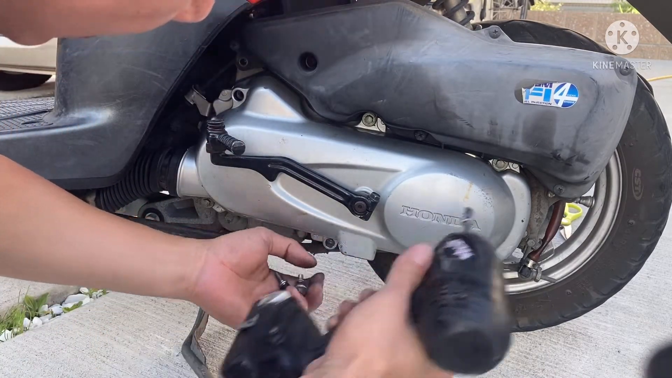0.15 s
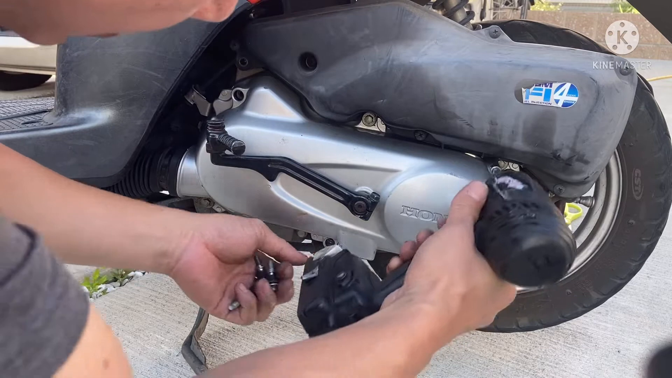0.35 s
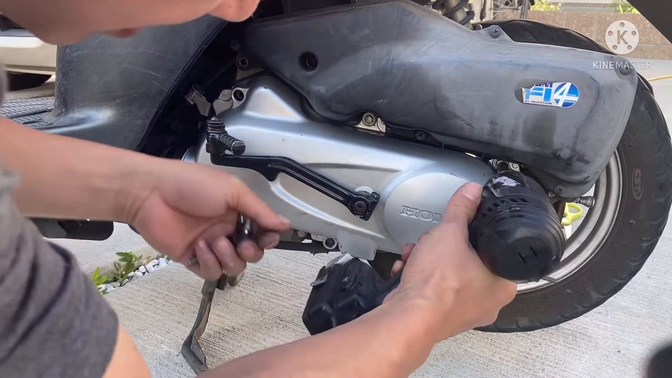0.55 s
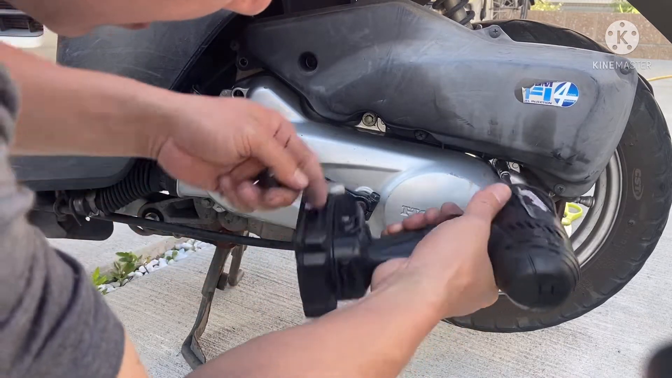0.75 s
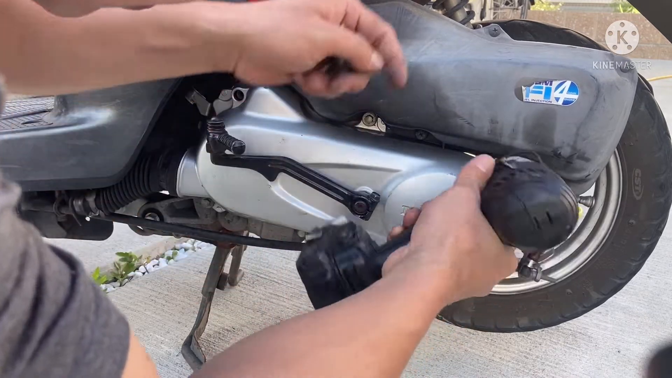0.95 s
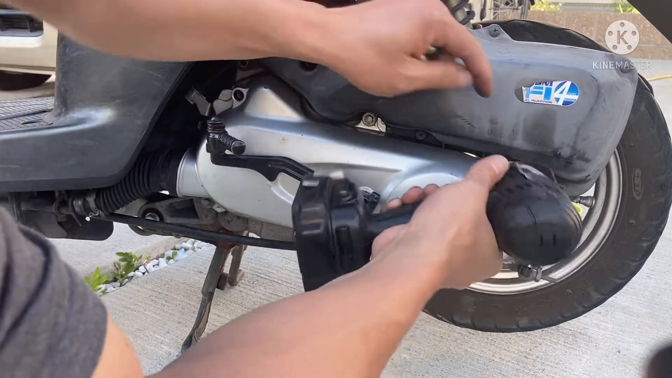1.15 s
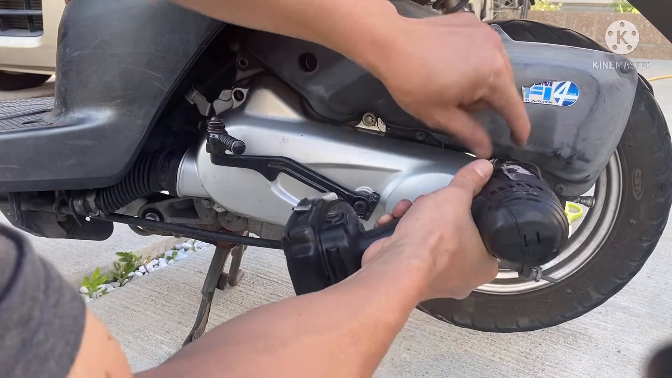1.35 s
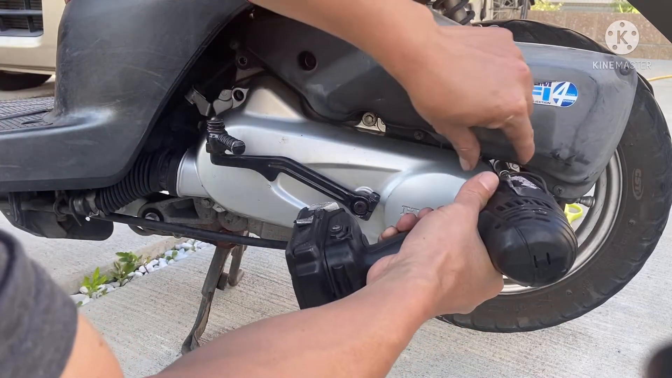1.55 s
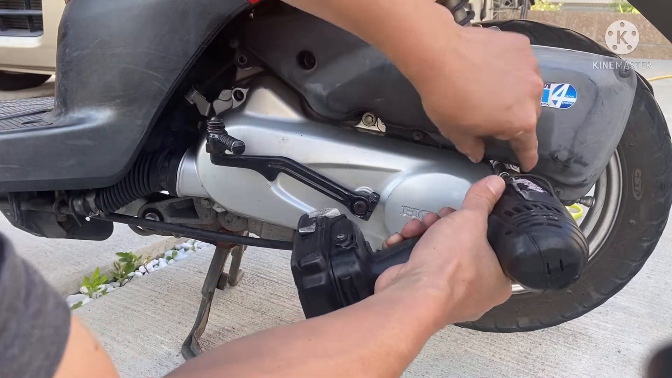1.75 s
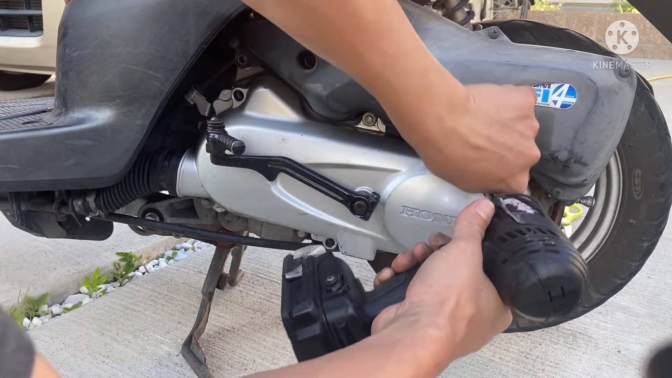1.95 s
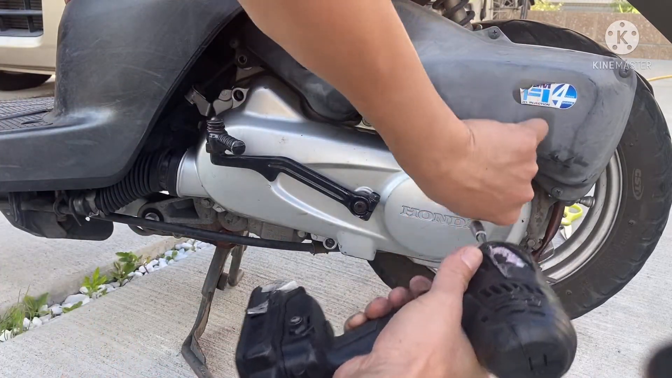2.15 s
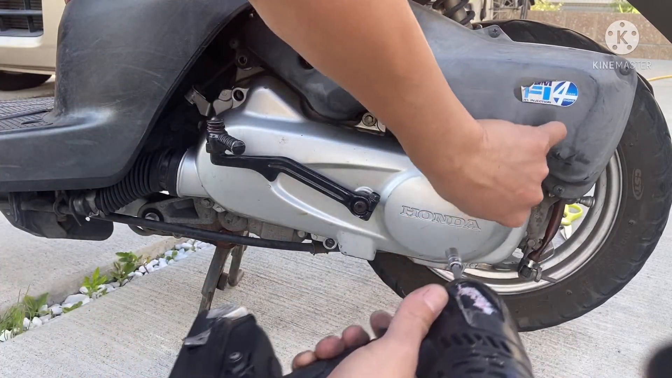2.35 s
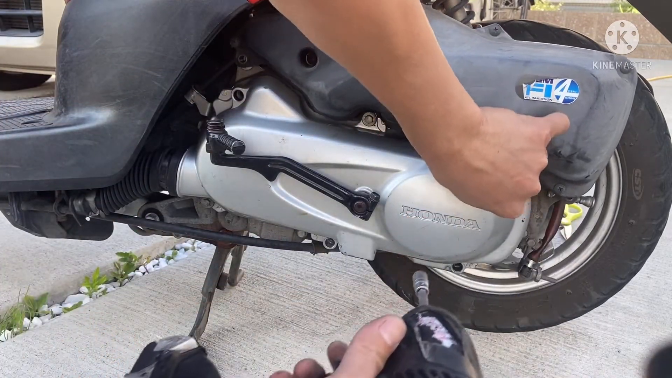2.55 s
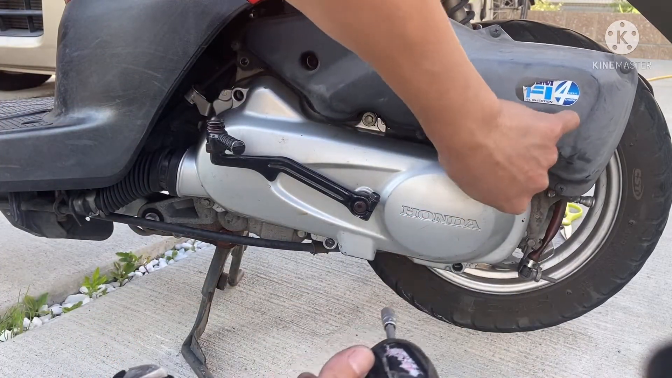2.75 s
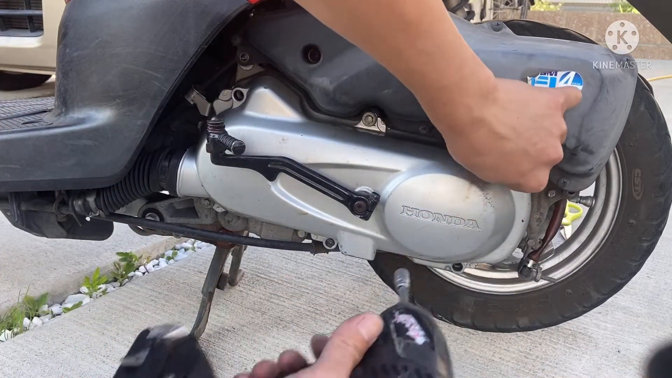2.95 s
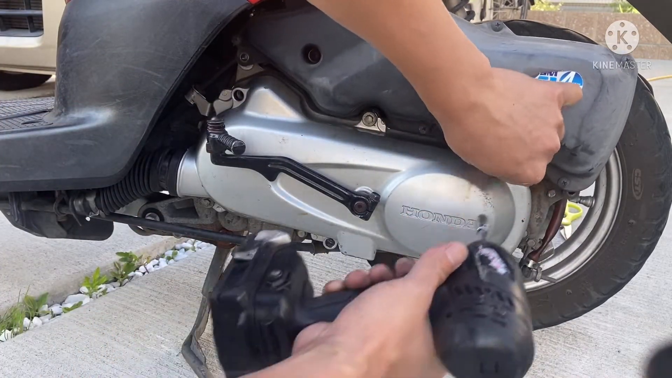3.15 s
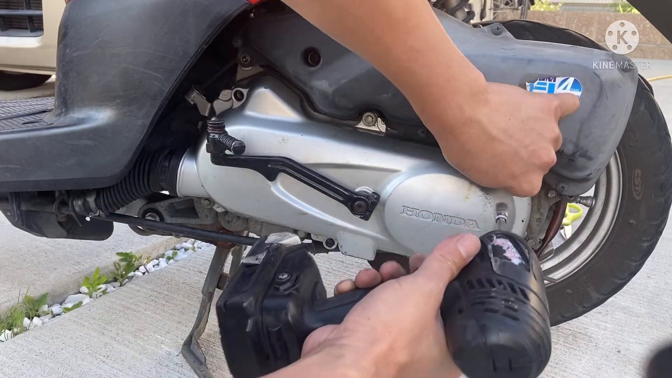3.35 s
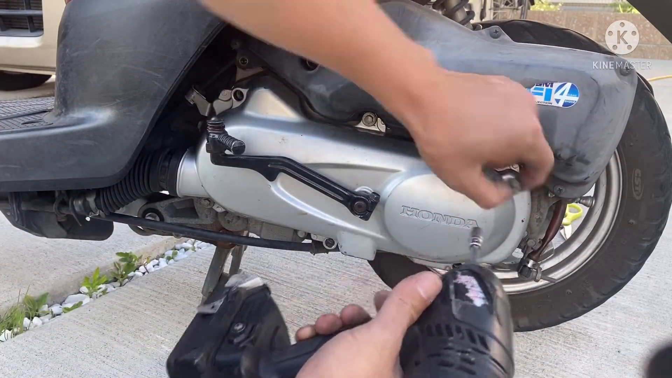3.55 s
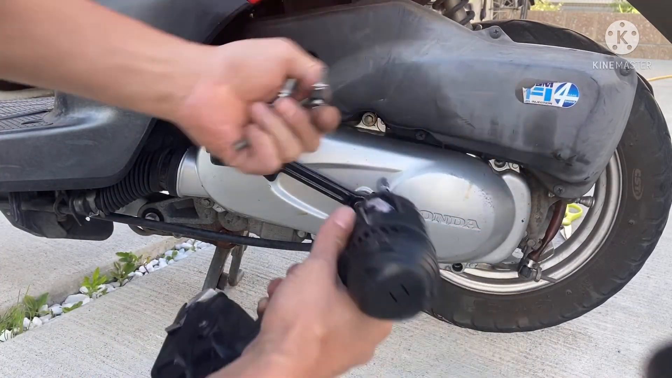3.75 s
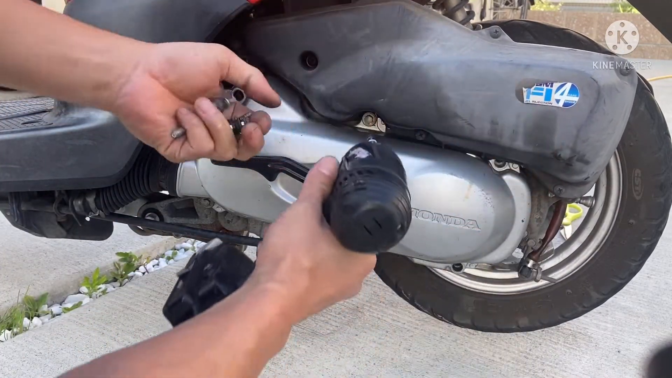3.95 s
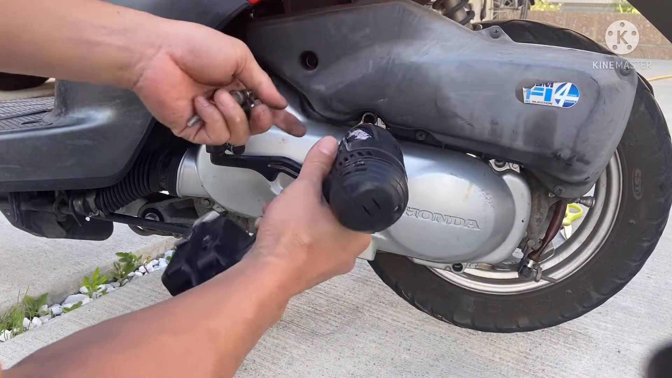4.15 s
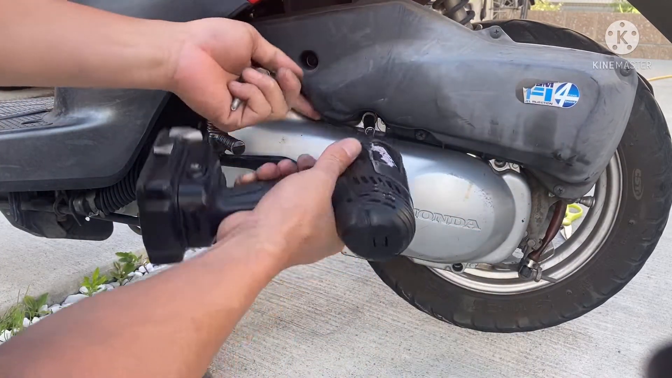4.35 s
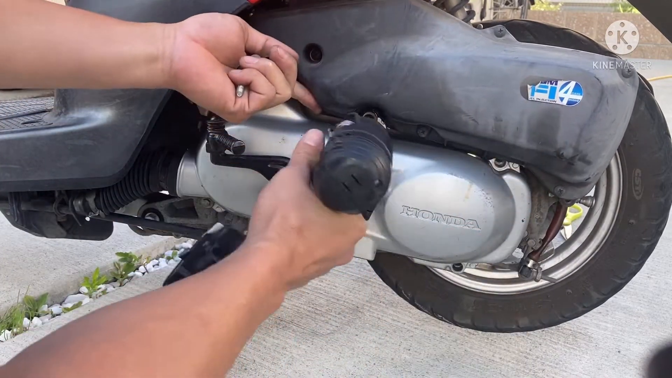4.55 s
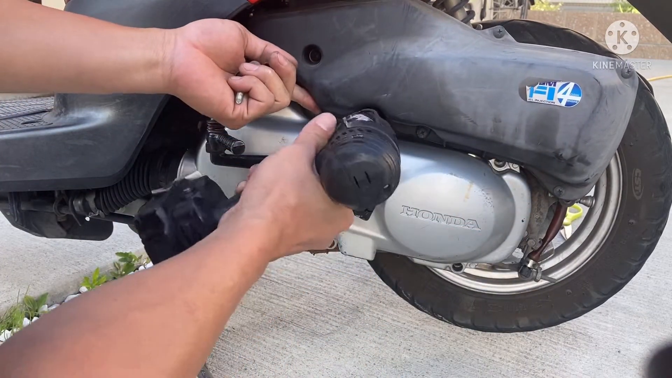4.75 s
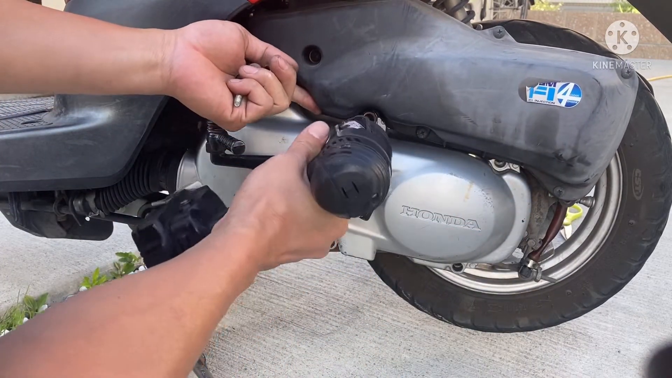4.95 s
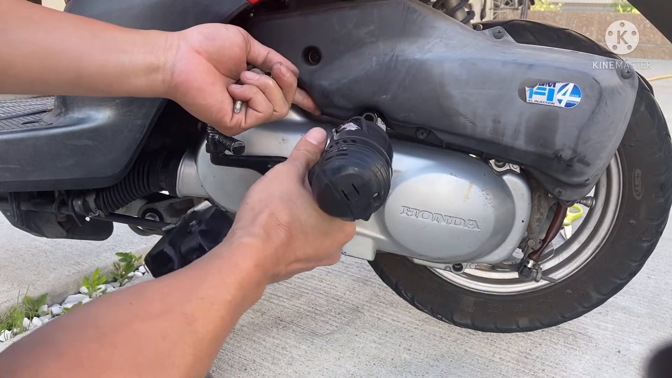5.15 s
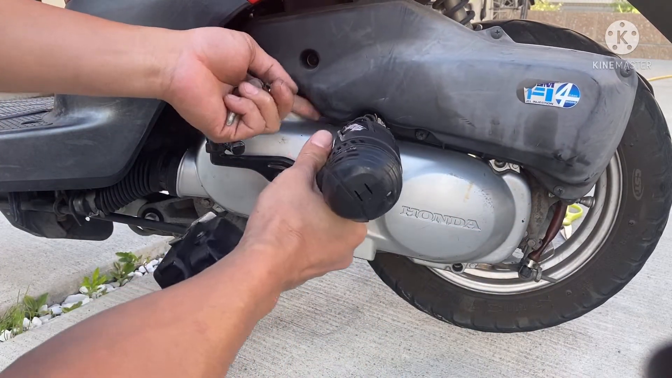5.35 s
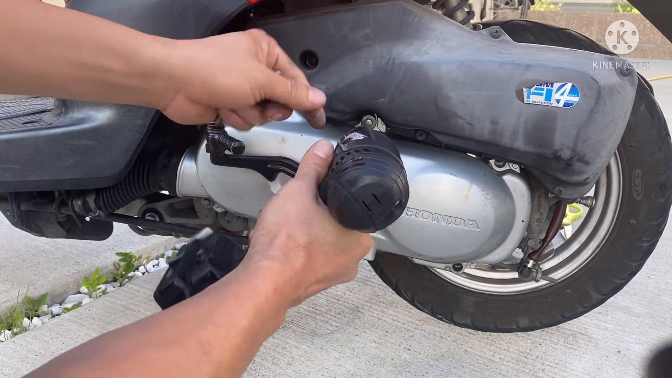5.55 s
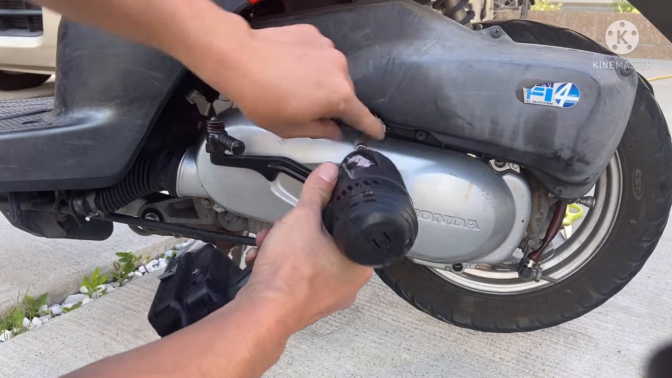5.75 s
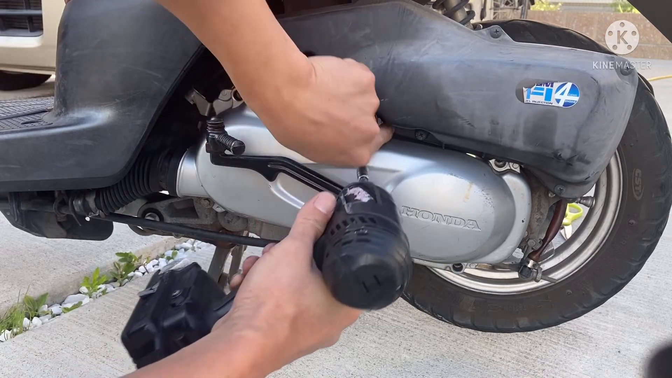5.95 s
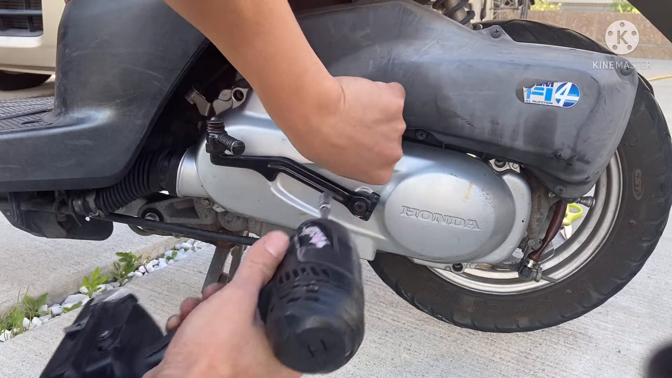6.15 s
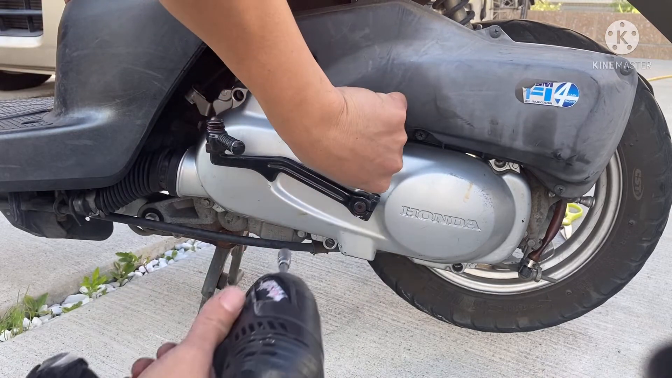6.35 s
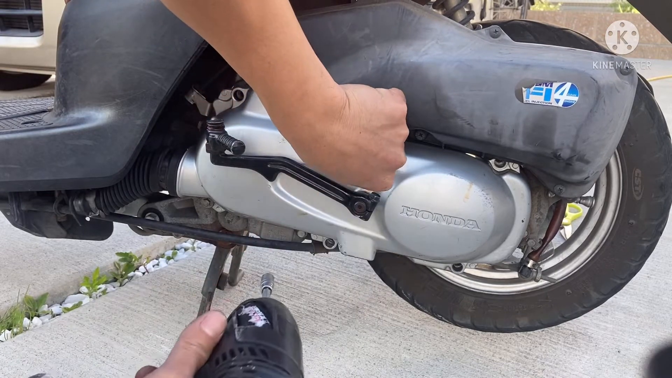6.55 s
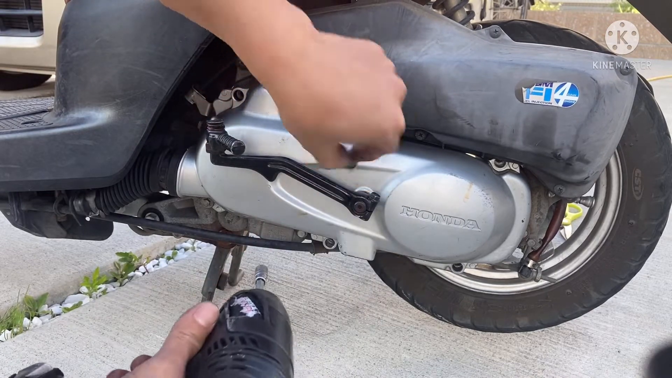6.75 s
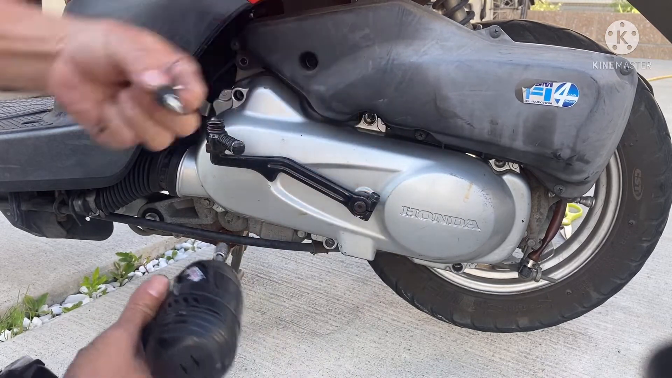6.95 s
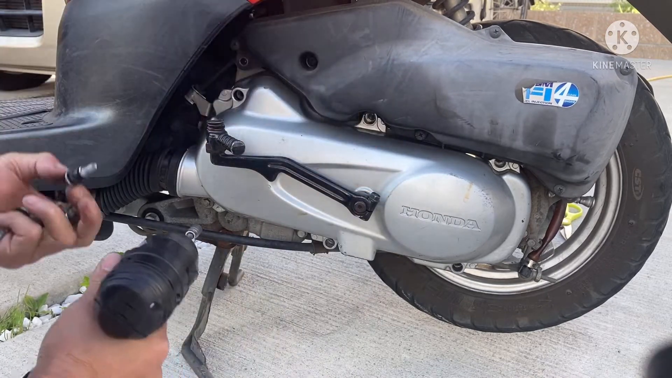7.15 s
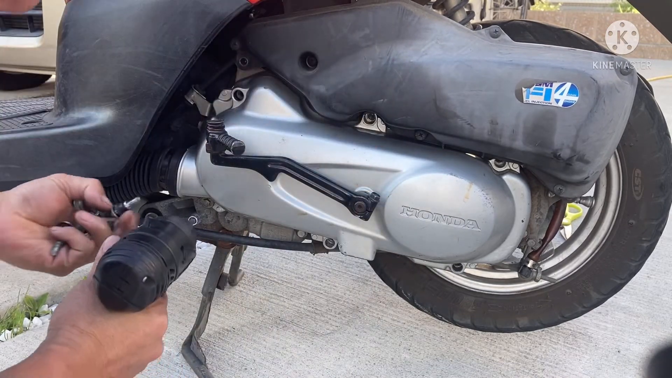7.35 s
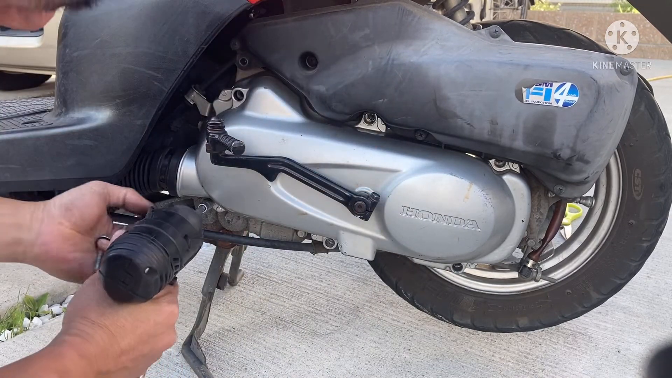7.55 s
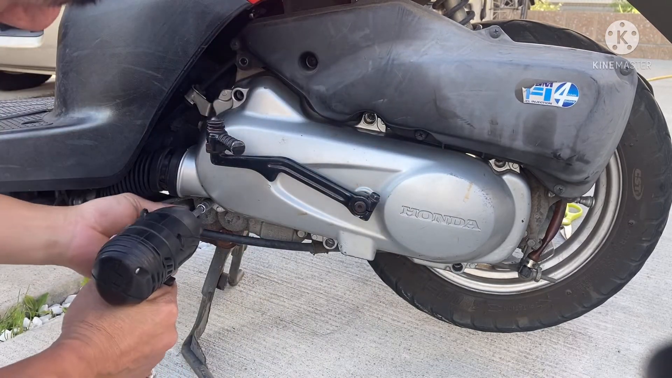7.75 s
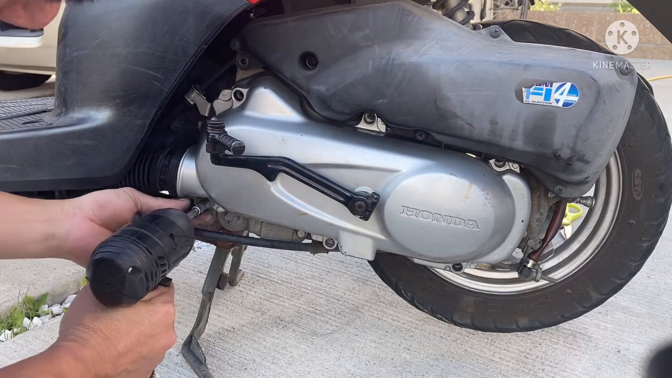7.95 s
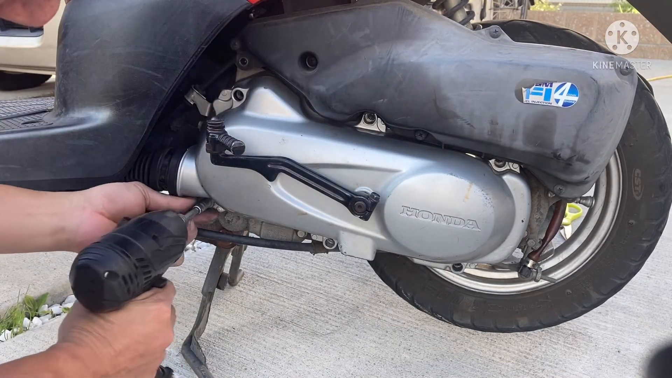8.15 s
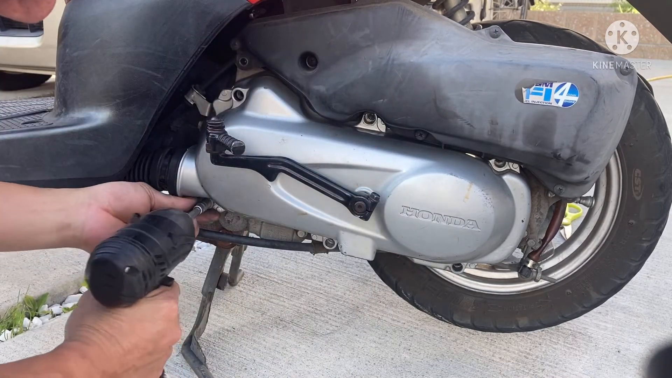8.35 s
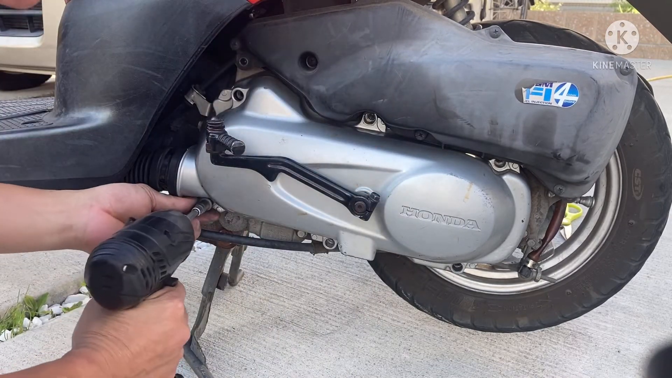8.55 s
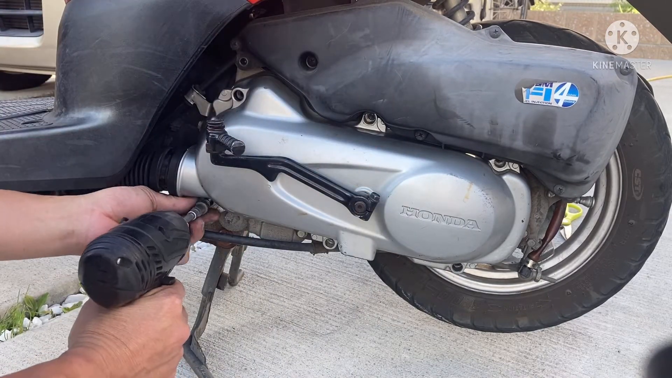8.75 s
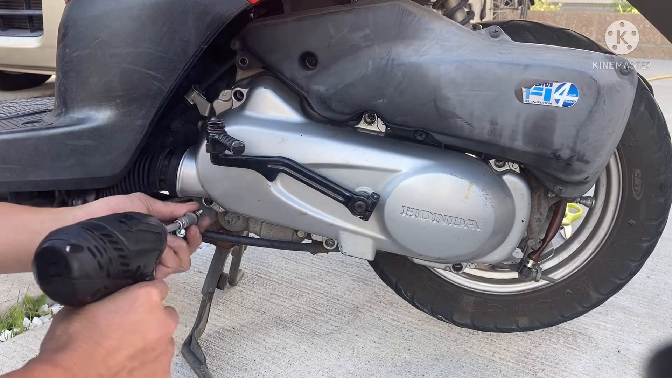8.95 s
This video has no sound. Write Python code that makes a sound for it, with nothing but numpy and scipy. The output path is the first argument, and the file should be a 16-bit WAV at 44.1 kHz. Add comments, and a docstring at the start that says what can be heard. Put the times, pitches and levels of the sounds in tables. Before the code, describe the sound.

Socket and loose bolts clink on a hollow scooter engine cover as a power driver spins three times, rattling hard once, over light wind.

```python
"""Light wind and far traffic lie under everything; socket and loose bolts clink and rattle by a scooter engine.
A cordless impact driver then spins three bolts out of the cast cover, its brushed motor whining in
commutator and gear orders over brush hiss and grinding thread. Between runs metal clinks, knocks and
scrapes; on the tight second bolt a hammer strikes the anvil; a short squeak comes before the third run.
Clinks and blows are noise bursts ringing modes of cover and steel; two close microphones hear the work."""
import sys
import numpy as np
from scipy import signal
from scipy.fft import rfft, irfft, next_fast_len
from scipy.io import wavfile
from scipy.ndimage import map_coordinates

SR = 44100
rng = np.random.default_rng(int(sys.argv[2]) if len(sys.argv) > 2 else 0)


def materialize(psi):
    """Save the field psi as 16-bit PCM at rate SR to the path in sys.argv[1].

    A 1-D psi becomes a single channel; in a 2-D psi each row is a channel.
    """
    bounded = np.clip(np.atleast_2d(psi).T, -1, 1)
    quanta = np.round(bounded * 32767).astype(np.int16)
    wavfile.write(sys.argv[1], SR, quanta)


def convert_level_to_amplitude(level_db):
    """Map a level in decibels to its linear amplitude factor."""
    exponent = np.asarray(level_db, float) / 20
    return 10 ** exponent


N = 396459  # samples, about 9 s
LEAD = SR // 50  # samples of rattle before a contact lands

# Spectrum of brush and fan hiss, lent to rustling sleeves too. Each row: frequency in Hz, relative density in dB.
HISS = [(2500, -29), (4200, -7), (6000, -13), (7600, -3.5), (9000, -4), (11000, -4), (13000, -5.5),
        (15600, -7.5)]
# Modes of the cast cover. Each row: frequency in Hz, width in Hz, relative level in dB.
COVER = [(577, 400, -0.5), (1344, 380, 4.5), (2360, 550, 2.5), (2995, 440, 0.5), (4020, 580, -2.5)]
# Modes of the steel socket and anvil. Each row: frequency in Hz, width in Hz, relative level in dB.
STEEL = [(5630, 670, -8), (8000, 2800, -4), (12100, 3500, -7), (15600, 720, -8.5)]


def unit(x):
    """Scaled to rms 1."""
    return x / np.sqrt(np.mean(x ** 2) + 1e-20)


def along(points, hz):
    """Reads a curve of (Hz, value) points on a log frequency axis."""
    f, v = np.transpose(points)
    return np.interp(np.log(hz + 1), np.log(f + 1), v)


def curves(rows):
    """Straight lines between timed rows: one value per sample for each column after the time."""
    s, *cols = np.transpose(rows)
    return np.array([np.interp(np.arange(N) / SR, s, c) for c in cols])


def wobble(rate):
    """A random curve of straight lines between knots, rate knots a second."""
    return map_coordinates(rng.standard_normal(int(N * rate / SR) + 4), [np.arange(N) * rate / SR], order=1)


def filtered(x, response):
    """Filters x by a complex response of frequency."""
    m = next_fast_len(x.shape[-1] + 4096)
    return irfft(rfft(x, m) * response(np.fft.rfftfreq(m, 1 / SR)), m)[..., :x.shape[-1]]


def noise(spectrum, channels=1):
    """Coloured noise of rms 1, falling away steeply outside its points."""
    ends = [(0, -120)] + spectrum + [(SR / 2, -120)]
    return unit(filtered(rng.standard_normal((channels, N)), lambda hz: convert_level_to_amplitude(along(ends, hz))))


def resonances(modes, detune=0, scatter_db=0):
    """Causal response of a few modes in alternating sign, each randomly detuned and scattered in level."""
    luck = rng.standard_normal((len(modes), 2))

    def response(f):
        total = 0
        for k, ((centre, width, db), (a, b)) in enumerate(zip(modes, luck)):
            hz = centre * (1 + detune * a)
            gain = (-1) ** k * convert_level_to_amplitude(db + scatter_db * b)
            total = total + gain * 1j * f * width / (hz ** 2 - f * f + 1j * f * width)
        return total
    return response


def grit(rate, spread_db, smooth, t60):
    """Sparse short rattles of very unequal size on a little noise, ringing the metal; rms 1."""
    sizes = convert_level_to_amplitude((spread_db * rng.exponential(size=N)).clip(0, 14))
    spikes = (rng.random(N) < rate / SR) * sizes
    bursts = signal.fftconvolve(spikes, convert_level_to_amplitude(-60 * np.arange(SR // 20) / SR / t60))[:N]
    rough = (unit(bursts) + smooth) * rng.standard_normal(N)
    return unit(filtered(rough, resonances(COVER + STEEL)))


def gate(on, off, rise, fall):
    """0 dB from on to off, with straight slopes in dB per second on both sides."""
    t = np.arange(N) / SR
    return np.maximum(rise * np.minimum(t - on, 0) - fall * np.maximum(t - off, 0), -120)


def stroke_db(start_s, length_s):
    """Level in dB of one brief rub of metal, quick to start and slower to die."""
    return gate(start_s, start_s + length_s, rise=1400, fall=464)


def blow(tick_db, t60, rise, detune):
    """One contact, peak about 1 before the tick: a rattling burst through the cover and the steel."""
    t = (np.arange(SR // 8) - LEAD) / SR
    slide = convert_level_to_amplitude(-29.5 + 60 * t / 0.067)  # loose parts slide into touch
    onset = np.where(t < 0, slide, 1 - 0.99 * np.exp(-t.clip(0) / rise))
    crack = 0.72 * convert_level_to_amplitude(-60 * abs(t - rise) / 0.0053)

    def ring(life, modes, scatter_db):
        burst = onset * (convert_level_to_amplitude(-60 * t.clip(0) / life) + crack) * rng.standard_normal(len(t))
        rung = filtered(burst, resonances(modes, detune, scatter_db))
        return rung / np.abs(rung).max()

    body = ring(t60, COVER, scatter_db=1.5)
    tick = ring(0.52 * t60, STEEL, scatter_db=3.5)  # steel dies sooner
    return body + convert_level_to_amplitude(tick_db) * tick


def add_at(out, start, sound):
    """Mixes a sound into out from sample start."""
    out[start:start + len(sound)] += sound


def air():
    """Lumpy wind, nearly the same on both ports, brighter when strong, over distant rumble."""
    # Wind spectrum. Each row: frequency in Hz, relative density in dB.
    gust = [(25, -20.5), (60, 0.5), (170, -11.5), (320, -26), (500, -42)]
    # Far traffic spectrum. Each row: frequency in Hz, relative density in dB.
    yard = [(60, -5), (250, -7), (700, -9), (1500, -19.5), (15500, -44)]
    # Wind on the microphone ports. Each row: time in seconds, level in dB before the flapping is added.
    wind = [(0, -65.5), (1.3, -54), (2.55, -60.5), (2.85, -49.5), (3.3, -62), (3.6, -53), (4.0, -58.5),
            (4.2, -41.5), (4.38, -56.5), (4.46, -42.5), (4.6, -52.5), (6.0, -59), (6.15, -46.5),
            (6.35, -64), (6.7, -58), (6.85, -63.5), (8.99, -60.5)]
    gusts = convert_level_to_amplitude(4 * wobble(14)) * (noise(gust) + .6 * noise(gust, channels=2))
    wind_db = curves(wind)[0]
    flap = filtered(gusts.mean(0), lambda hz: hz ** 2 / (hz ** 2 + 200 ** 2))
    flap_gain = convert_level_to_amplitude(.5 * (wind_db + 39))  # strong gusts reach higher
    rumble = noise(yard) + 0.74 * noise(yard, channels=2)
    return convert_level_to_amplitude(wind_db) * (unit(gusts) + flap_gain * unit(flap)) + convert_level_to_amplitude(-71.0) * rumble


def hands():
    """Faint, dull rattle of bolts held in a hand, with the rustle of skin and sleeves."""
    # Hands and loose bolts shifting. Each row: time in seconds, level of the rattle in dB.
    shifting = [(0.3, -80), (.5, -73.5), (1.15, -64), (2.3, -74), (3.6, -77.5), (4.25, -67.5), (5.8, -79),
                (6.6, -73.5), (6.8, -93), (7.25, -71.5), (7.75, -90.5), (8.05, -64.5)]
    rattle = grit(rate=28, spread_db=2, smooth=0.5, t60=.018)
    held = unit(filtered(rattle, lambda hz: 1 / (1 + 1j * hz / 5000)))  # the hand dulls it
    held = held + convert_level_to_amplitude(-10.0) * noise(HISS)[0]
    return convert_level_to_amplitude(curves(shifting)[0] + 2.2 * wobble(7.5)) * held


def clinks():
    """Socket, chuck and bolts touch metal: light contacts that ring the cover and the steel."""
    # Each row: time in seconds, peak of the cover's ring in dB, peak of the steel tick over it in dB.
    touches = [(0.422, -35.5, 0.5), (0.444, -29, -16), (0.462, -28, -23), (0.479, -41, -15),
               (0.551, -27, -4), (0.605, -30.5, -9), (0.678, -39.5, -38), (0.878, -50, 3.5),
               (1.001, -21, 0.5), (1.14, -44, -1), (1.245, -24.5, 5), (1.266, -16.5, -3.5),
               (1.273, -14, 0.5), (1.903, -37.5, 4.5), (2.695, -33, -7), (2.737, -19.5, 2),
               (2.855, -32, -14), (2.968, -34.5, -10), (3.052, -26, 4.5), (3.098, -29, 3),
               (3.211, -42, -23), (3.24, -39.5, -25), (3.283, -40.5, -0.5), (3.402, -36.5, 9),
               (3.725, -63, 31), (3.968, -24.5, -3), (4.055, -49.5, 16), (4.138, -20.5, -1),
               (4.203, -24.5, -1), (4.671, -25, -8.5), (4.741, -38.5, 2), (4.849, -29, 3.5),
               (5.545, -21.5, -14), (5.659, -45.5, 7), (5.996, -44, -11), (6.181, -40.5, -40.5),
               (6.308, -51, -18), (6.65, -42, 10), (7.114, -67, 21), (7.541, -31.5, -6), (7.904, -38.5, 2),
               (8.047, -46.5, -2), (8.089, -31.5, 0.5), (8.299, -27.5, 7), (8.318, -22, 3.5),
               (8.8, -27.5, 8.5), (8.943, -54.5, -14)]
    out = np.zeros(N + SR)
    for s, db, tick_db in touches:
        contact = blow(tick_db, t60=0.041, rise=0.00053, detune=0.098)
        add_at(out, round(s * SR) - LEAD, convert_level_to_amplitude(db) * contact)
    return out[:N]


def knocks():
    """Dull knocks of tool and hand on the bodywork: a decaying sine booms in a panel with a rattle."""
    # Each row: time in seconds, level of the boom in dB, pitch in Hz.
    thumps = [(1.003, -29.5, 230), (1.274, -24.5, 209), (1.765, -32.5, 770), (1.799, -32.5, 790),
              (1.93, -38, 530), (2.739, -24.5, 171.4), (2.9, -27.5, 162), (4.445, -47, 450),
              (4.469, -37.5, 416), (4.879, -22.5, 221.8), (6.126, -37, 74), (7.472, -48, 585),
              (7.49, -45, 260), (8.092, -42.5, 214)]
    out, t = np.zeros(N + SR), np.arange(SR // 8) / SR
    for s, db, hz in thumps:
        boom = convert_level_to_amplitude(-60 * t * hz / 18) * np.sin(2 * np.pi * hz * t)  # down 60 dB in 18 cycles
        panel = resonances([(1.4 * hz, 2.5 * hz, 4)])
        rattle = filtered(rng.standard_normal(len(t)), lambda f: panel(f) ** 2)
        add_at(out, round(s * SR), convert_level_to_amplitude(db) * (boom + convert_level_to_amplitude(-60 * t / 0.16) * rattle))
    return out[:N]


def trigger():
    """Hiss and grind in dB: each pull has a start level, settles, and is braked; loosening shifts the grind."""
    # Pulls of the trigger. Each row: on in seconds, off in seconds, brush and fan hiss at first in dB,
    # the same hiss once settled in dB.
    pulls = [(1.244, 1.853, -32, -35), (4.733, 4.829, -59, -52.5), (4.871, 5.131, -23.5, -46),
             (5.129, 5.607, -41.5, -33.5), (8.321, 8.896, -30.5, -36)]
    # The bolt grinding at each pull. Each row: biting level in dB, turning level in dB,
    # time it comes loose in seconds, loose level in dB.
    bolts = [(-39, -45.5, 1.626, -41.5), (-64, -60.5, 4, -60.5), (-25, -42, 5.7, -41.5),
             (-47.5, -47, 5.42, -40.5), (-42, -45, 8.65, -42)]
    start_db_per_s, brake_db_per_s = 1094.5, 653.5
    settle_s, loosen_s = 0.14, 0.013
    t, levels = np.arange(N) / SR, []
    for (on, off, first_db, held_db), (bite_db, turn_db, loose, loose_db) in zip(pulls, bolts):
        fresh = np.exp(-(t - on).clip(0) / settle_s)
        free = (1 + np.tanh((t - loose) / loosen_s)) / 2
        hiss_db = held_db + (first_db - held_db) * fresh
        grind_db = turn_db + (bite_db - turn_db) * fresh + (loose_db - turn_db) * free
        levels.append(gate(on, off, start_db_per_s, brake_db_per_s) + [hiss_db, grind_db])
    return np.max(levels, axis=0)  # the loudest pull wins


def motor():
    """Brush hiss flutters once a turn; every order wavers on its own and sings clearer at full speed."""
    # Armature speed, one list per bolt. Each row: time in seconds, commutator bars passing in Hz.
    speed = [
        [(1.24, 1851), (1.3, 1993), (1.39, 2079), (1.62, 2151), (1.68, 2207), (1.79, 2188), (1.82, 2099),
         (1.87, 1751)],
        [(5.15, 1747), (5.29, 2016), (5.4, 2167), (5.45, 2200), (5.53, 2225), (5.565, 2147), (5.63, 1600)],
        [(8.3, 1605), (8.46, 1994), (8.58, 2183), (8.81, 2236), (8.87, 2056), (8.92, 1600)],
    ]
    # Motor and gear tones. Each row: multiple of the bar rate, then the tone's amplitude over the hiss rms
    # at full speed in dB, for the first, second and third bolt.
    orders = [(.6, -22, -26, -24), (1, -19, -28, -19), (1.8, -15, -15, -17), (2, -11, -10, -11),
              (2.4, -16, -18, -16), (3, -10, -8, -9), (4, -14, -8, -3), (5, -5, -3, -10), (6, -12, -14, -6),
              (7, -12, -11, -7)]
    # Bolt grinding in the cover. Each row: frequency in Hz, relative density in dB.
    grind_spectrum = [(100, -2.5), (220, -0.5), (800, -7), (1350, 3.5), (2200, -1), (3800, -2.5),
                      (5500, -12.5)]
    run_ends = [rows[-1][0] + 1 for rows in speed[:-1]]
    run = np.digitize(np.arange(N) / SR, run_ends)  # which bolt
    hiss_db, grind_db = trigger()
    bars = curves(sum(speed, []))[0]
    phase = 2 * np.pi * np.cumsum(bars * (1 + .004 * wobble(150))) / SR
    turn = 1 + 0.13 * np.sin(phase / 10)  # ten bars to a turn of the armature
    hiss = noise(HISS)[0] * turn * convert_level_to_amplitude(0.87 * wobble(300) + 1.4 * wobble(25))
    clear_db = 110 * np.minimum(bars / 2100 - 1, 0)  # tones sink below 2100 bars a second
    tones = np.zeros(N)
    for multiple, *run_db in orders:
        level = convert_level_to_amplitude(np.take(run_db, run) + 3 * wobble(20))
        tones += level * np.sin(multiple * phase + rng.uniform(0, 2 * np.pi))
    grind = noise(grind_spectrum)[0] * convert_level_to_amplitude(1.9 * wobble(90) + 0.19 * wobble(26))
    whine = unit(hiss) + convert_level_to_amplitude(clear_db) * turn * tones
    return convert_level_to_amplitude(hiss_db) * whine + convert_level_to_amplitude(grind_db) * unit(grind)


def scrape():
    """Thread catches on the rough casting: coarse grit through a high-pass, gated to a short stroke."""
    # Metal dragged over the casting. Each row: start in seconds, length in seconds, level in dB.
    strokes = [(3.413, 0.038, -37.5)]
    stroke = sum(convert_level_to_amplitude(db + stroke_db(s, length)) for s, length, db in strokes)
    rasp = grit(rate=300, spread_db=6, smooth=.3, t60=.006)
    return stroke * unit(filtered(rasp, lambda hz: 1j * hz / (1j * hz + 3000)))


def hammer():
    """Hammer on anvil: the jaws catch, then blows come steadily and slow, weakening, each led by a cam click."""
    bite_s, bite_db = 4.872, -7.5  # the jaws first catch
    first_blow_s, blow_db, blow_loss_db, scatter_db = 4.8875, -7.5, 1.02, 1  # loss is per blow
    blows, steady_blows = 10, 6
    gap_s, gap_grows_s = .0236, 0.0025  # the gap lengthens blow by blow as the trigger eases
    cam_lead_s, cam_db, cam_loss_db = .008, -20, .6  # the hammer clicks over its cam just before it lands
    k = np.arange(blows)
    late = (k - steady_blows).clip(0)
    s = first_blow_s + gap_s * k + gap_grows_s * late * (late + 1) / 2
    scatter = scatter_db * rng.standard_normal((2, blows))
    strike_db = blow_db - blow_loss_db * k + scatter[0]
    click_db = cam_db - cam_loss_db * k + scatter[1]
    out = np.zeros(N + SR)
    for at, db in [(bite_s, bite_db), *zip(s, strike_db), *zip(s - cam_lead_s, click_db)]:
        contact = blow(tick_db=1.0, t60=0.022, rise=0.0018, detune=0.051)
        add_at(out, round(at * SR) - LEAD, convert_level_to_amplitude(db) * contact)
    return out[:N]


def squeak():
    """Something squeaks briefly: three harmonics, each weaker in proportion to its number."""
    start_s, length_s, pitch_hz, level_db = 7.845, 0.024, 562, -63.5
    t = np.arange(N) / SR
    tone = sum(np.sin(2 * np.pi * k * pitch_hz * t) / k for k in (1, 2, 3))
    return convert_level_to_amplitude(level_db + stroke_db(start_s, length_s)) * tone


def nearby(x):
    """Ground, bodywork and hands throw short reflections, different at each microphone and each place."""
    # The work moves along the cover. Each row: from time in seconds, delay of the right microphone in samples;
    # the last row only marks the end.
    places = [(0, 0), (3.65, 1), (7.3, 8), (9, 0)]
    out, t = np.zeros((2, N + SR)), np.arange(SR // 16) / SR
    for (start, late), (end, _) in zip(places, places[1:]):
        tail = rng.standard_normal((2, len(t))) * convert_level_to_amplitude(-60 * t / 0.022)
        tail = filtered(tail, lambda hz: 1j * hz / (1j * hz + 600))  # long waves bend round all of it
        tail = convert_level_to_amplitude(-1.0) * tail / np.linalg.norm(tail[0])
        tail[[0, 1], [0, late]] += 1  # the direct path
        heard = signal.fftconvolve(x[None, round(start * SR):round(end * SR)], tail, axes=1)
        out[:, round(start * SR):][:, :heard.shape[1]] += heard
    return out[:, :N]


def scene():
    """All work sounds pass the near reflections and stand a little to the left; the air is added around them."""
    # Balance of the work. Each row: frequency in Hz, left over right in dB.
    left = [(200, 0), (1200, 3.5), (6500, 3.5)]
    work = nearby(hands() + clinks() + knocks() + motor() + scrape() + hammer() + squeak())
    placed = filtered(work, lambda hz: convert_level_to_amplitude(along(left, hz) * [[.5], [-.5]]))
    return placed + air()


def top_cut(x):
    """Nothing passes above the cut-off."""
    return signal.sosfilt(signal.butter(12, 16990, fs=SR, output="sos"), x)


def record(dry):
    """Above a crossover both channels carry the left's treble, left inverted and later; peaks round off."""
    crossover_hz, top_hz, top_order = 5800, 15900, 160
    lag_s = .0002205  # left behind right, half of it on each side

    def high(hz):
        return 1 / (1 + (crossover_hz / (hz + 1)) ** 14) ** .5

    def skew(hz):
        return np.array([-np.exp(-1j * np.pi * hz * lag_s), np.exp(1j * np.pi * hz * lag_s)])

    treble = filtered(dry[0], lambda hz: high(hz) * skew(hz) / (1 + (hz / top_hz) ** top_order))
    low = filtered(dry, lambda hz: np.sqrt(abs(1 - high(hz) ** 2)))
    return top_cut(np.tanh(low + treble))


dry = scene()
out = record(dry)
materialize(out)
```